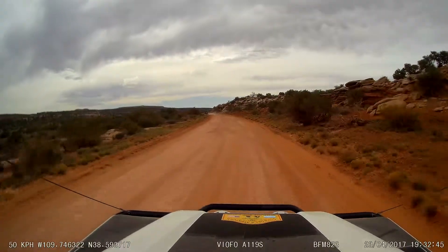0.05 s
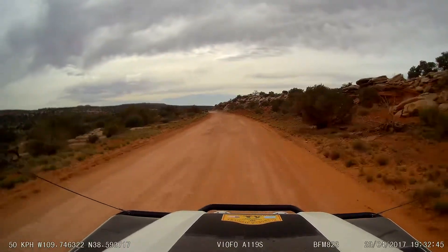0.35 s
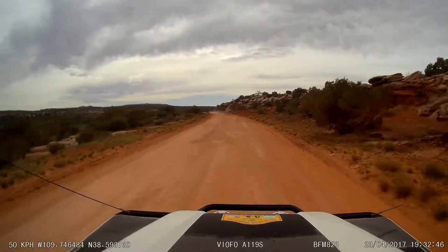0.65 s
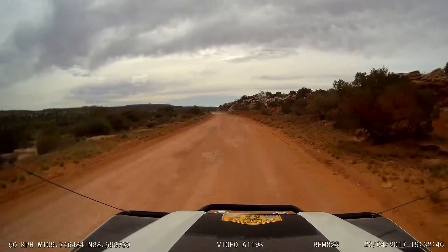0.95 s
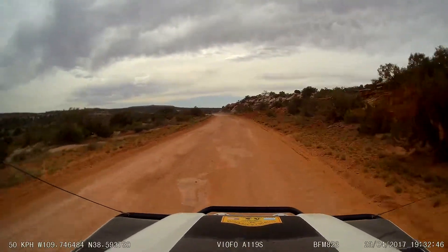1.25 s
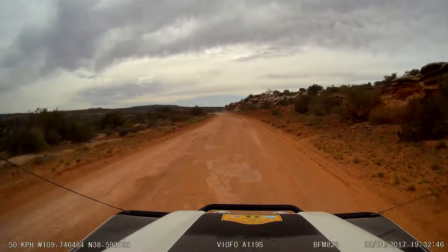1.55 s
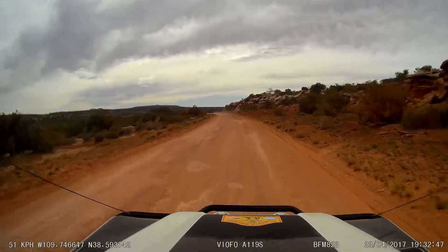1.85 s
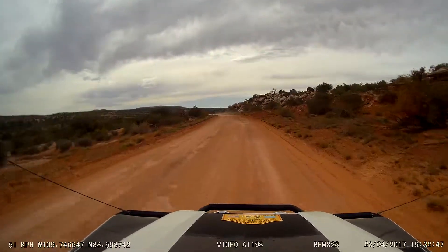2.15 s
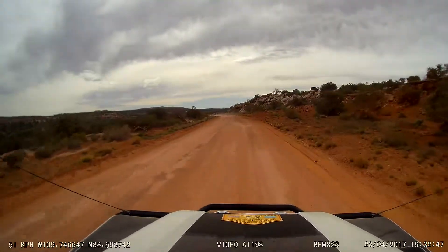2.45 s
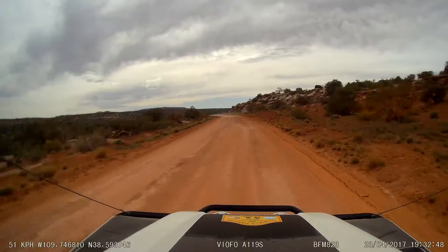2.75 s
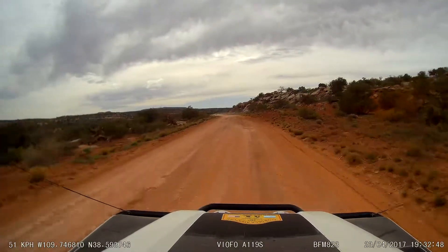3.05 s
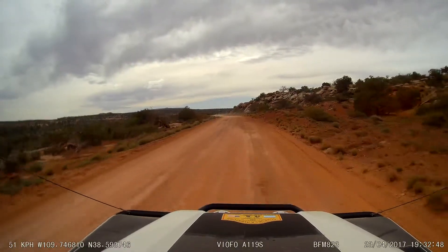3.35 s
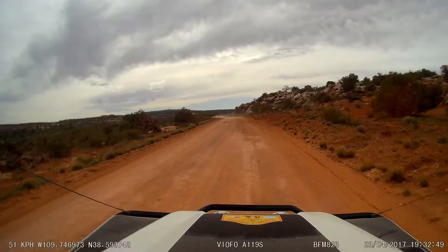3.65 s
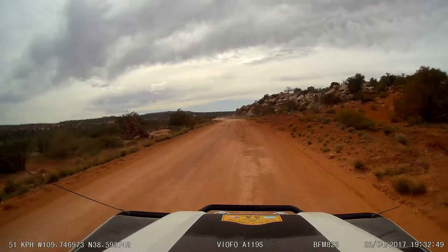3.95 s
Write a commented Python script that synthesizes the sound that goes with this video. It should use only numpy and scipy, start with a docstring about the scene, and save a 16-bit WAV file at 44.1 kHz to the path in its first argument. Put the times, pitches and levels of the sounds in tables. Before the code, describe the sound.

A vehicle drives steadily along a rough dirt road, heard inside at the windscreen. Over low rumble, tyre roar and engine drone, loose plastic knocks in quick runs. Midway, harder bumps bring thuds and brighter clacks, then the knocking continues.

```python
"""Vehicle at steady speed on a rough dirt road, heard from the windscreen.
From the start: body rumble, tyre roar, engine drone, a thin whine. Close by, the road shakes a loose
plastic part against a panel in quick runs of knocks. From 1.1 to 2.4 s the hardest bumps thud through
the suspension, set the body booming and slap the trim in brighter clacks.
Two lighter bumps follow; the knocks run on to the end."""
import sys
import numpy as np
from scipy import signal
from scipy.fft import rfft, irfft
from scipy.io import wavfile
from scipy.ndimage import uniform_filter1d

SR = 44100
rng = np.random.default_rng(int(sys.argv[2]) if len(sys.argv) > 2 else 0)


def to_wav(sig):
    """Store sig (one row per channel, or 1-D mono) as 16-bit WAV at the path in sys.argv[1].

    Samples outside -1..1 are clipped; the rate is SR.
    """
    pcm = np.clip(np.atleast_2d(sig), -1, 1) * 32767
    pcm = np.round(pcm).astype(np.int16)
    wavfile.write(sys.argv[1], SR, pcm.T)  # frames by channels


N = 176400

# knocks of the loose part: t/s, strength/dB
KNOCKS = [(0.0504, -11), (0.1847, -13), (0.2098, -6), (0.232, -12.5), (0.345, -6), (0.555, -5),
          (0.5793, -5.5), (0.6226, -10), (0.6626, -11.5), (0.7044, -7.5), (0.7418, -13), (0.7647, -11.5),
          (0.802, -11), (1.0862, -7.5), (1.1098, -8.5), (1.148, -8), (1.1842, -2), (1.21, 0.5),
          (1.2228, -6), (1.2333, 3), (1.2493, -7), (1.2617, -1), (1.2762, -6), (1.2893, 1), (1.3035, -9),
          (1.3128, -1), (1.334, -0.5), (1.3595, -2.5), (1.3812, -17), (1.4479, -3.5), (1.5102, -4),
          (1.5361, -2.5), (1.561, -3.5), (1.5832, -4), (1.6093, -5.5), (1.6303, -4), (1.6517, -6),
          (1.6722, -3.5), (1.697, -3.5), (1.7804, -8.5), (1.8044, -4.5), (1.8308, -3), (1.8506, -5.5),
          (1.8661, -3), (1.882, -10), (1.8976, 3), (1.9198, -3.5), (1.9766, -7.5), (2.002, -3.5),
          (2.0172, -11), (2.0333, 4), (2.0488, -6), (2.0716, -8), (2.0934, -6), (2.1153, -13), (2.1416, -9),
          (2.1645, -9.5), (2.206, -4), (2.2365, -5), (2.2565, -3.5), (2.28, -2), (2.3038, -6.5),
          (2.3252, -10.5), (2.35, -11.5), (2.3703, -6), (2.3993, -3.5), (2.4226, -5), (2.4435, -0.5),
          (2.47, -7), (2.4907, -4), (2.5295, -6.5), (2.5544, -5), (2.578, -10.5), (2.6399, -14),
          (2.7275, -6), (2.7647, -6), (2.7899, -5), (2.8285, -7.5), (2.8515, -6.5), (3.0293, -9),
          (3.0513, 0), (3.0753, -1.5), (3.116, -12.5), (3.1375, -16), (3.2131, -7), (3.238, -4),
          (3.2618, -10.5), (3.2856, -7.5), (3.4234, -6), (3.462, -7.5), (3.484, -8), (3.5481, -2.5),
          (3.5726, -4), (3.6139, -14), (3.6329, -14), (3.7107, -9), (3.7977, -13), (3.8204, -3.5),
          (3.8442, -8), (3.8846, -10.5)]
# knock spectrum: f/Hz, level/dB
KNOCK_SPECTRUM = [(100, -22.5), (330, -13), (650, -0.5), (950, 1), (1400, -5), (1950, -25.5), (2300, -15),
                  (2800, -8), (3150, -20.5), (3550, -31.5), (4100, -24.5), (4550, -31.5), (5100, -29),
                  (7700, -37), (9400, -31.5), (11000, -42), (16000, -52)]
# modes of the struck panel: f/Hz, level/dB, T60/s
PANEL_MODES = [(293, -38.5, 0.055), (638, -42, 0.022), (1410, -43.5, 0.014), (2670, -41, 0.021),
               (4075, -52.5, .018), (5100, -55.5, .018), (9200, -55.5, 0.01)]
# trim clacks: t/s, strength/dB, treble shelf/dB
CLACKS = [(1.1865, -9, -21), (1.2003, -8, 5.5), (1.2245, -5, 5.5), (1.2509, -8, 8), (1.2778, -2, 2.5),
          (1.3054, -11, 5), (1.3280, -17.5, 0), (1.487, -18, -8), (1.5028, -11.5, -4), (1.8515, -5, -10),
          (1.8660, -14, -11), (1.8836, -1, -5), (1.899, -16, -1), (1.9120, -13.5, -3), (2.0198, -1.5, -5),
          (2.0345, -11, 7), (2.0500, -15.5, -15), (2.0620, -16, -23), (2.2700, -15, -5), (2.3920, -23.5, 2),
          (2.4370, -11.5, -6)]
# clack spectrum: f/Hz, level/dB
CLACK_SPECTRUM = [(150, -13), (400, -13), (750, 2), (1100, -11.5), (1450, -2), (1900, -11.5), (2800, -7),
                  (3500, -19), (5000, -18), (8200, -19.5), (10000, -25.5), (12000, -27), (16000, -44)]
# road bumps: t/s, body boom/dB, suspension thud/dB
BUMPS = [(.155, -22.5, -46), (1.125, -16, -30), (1.22, -12.5, -41), (1.32, -21, -37), (1.45, -17, -34),
         (1.575, -17, -44), (1.69, -19.5, -46), (1.833, -12.5, -30), (1.885, -19, -25.5),
         (1.991, -14.5, -24.5), (2.04, -20, -35), (2.18, -15, -45), (2.359, -13.5, -30), (2.719, -19, -36),
         (2.916, -19, -51)]
# thud spectrum: f/Hz, level/dB
THUD_SPECTRUM = [(15, -36), (40, -9), (62, 4), (90, -1), (140, -3), (260, -7), (500, -32), (4000, -110)]
# body shake: t/s, level/dB
SHAKE = [(0, -24.5), (.13, -32.5), (.3, -31.5), (.48, -22.5), (.65, -26), (.78, -35.5), (.88, -27.5),
         (.98, -32.5), (1.3, -24.5), (1.55, -27), (1.7, -24.5), (1.95, -28), (2.25, -24), (2.45, -24.5),
         (2.6, -34), (2.8, -28.5), (3.03, -26.5), (3.14, -33), (3.3, -31.5), (3.5, -28.5), (3.7, -26.5),
         (4, -29.5)]
# body rumble spectrum: f/Hz, level/dB
RUMBLE_SPECTRUM = [(8, -40), (18, -6.5), (28, 3), (35, -5.5), (43, -2), (58, -7.5), (72, -14.5), (92, -28),
                   (115, -24.5), (200, -73.5), (2000, -130)]
# road roughness: t/s, level/dB
ROUGHNESS = [(0, -1), (1.05, -1), (1.25, 1), (1.42, 0.5), (1.55, 2), (1.75, -0.5), (1.9, 1.5), (2.06, 1),
             (2.3, 0.5), (2.6, 0), (3.3, -1), (4, -0.5)]
# tyre roar spectrum: f/Hz, level/dB
ROAR_SPECTRUM = [(40, -11), (90, -2.5), (120, 1.5), (180, -5.5), (280, -2), (370, -7), (440, -10),
                 (620, -10), (800, -14), (1100, -18.5), (1400, -16), (1700, -23), (2150, -35), (2750, -29),
                 (3300, -43), (4400, -42.5), (6500, -49.5), (16000, -53)]
# fizz spectrum of small rattles: f/Hz, level/dB
FIZZ_SPECTRUM = [(300, -7), (800, 13.5), (1400, 4.5), (2000, 4), (2800, -13), (3500, -8), (5000, -18),
                 (9000, -20.5), (12000, -21), (16000, -36)]
# hiss spectrum: f/Hz, level/dB
HISS_SPECTRUM = [(1000, 18), (5000, -17), (10000, -1), (14000, 5), (16000, -20)]
# engine speed: t/s, rotation rate/Hz
ENGINE_SPEED = [(0, 40.0), (.5, 40.5), (.9, 40), (1.3, 40.5), (1.9, 40.5), (2.6, 40.5), (3.2, 40.5),
                (4, 40.0)]
# engine orders, firing drone first: multiple of rotation rate, level/dB
ENGINE_ORDERS = [(2, -33), (3, -50.5), (4, -45.5), (5.07, -45.5), (6, -53), (8.4, -54.5), (7, -52.5),
                 (9, -52.5), (12, -48.5), (14, -56.5), (15.2, -52.5)]
# whine fundamental: t/s, level/dB
WHINE_LEVEL = [(0, -51.5), (.4, -50), (.9, -51), (1.2, -49), (1.7, -62), (2.1, -51.5), (2.7, -60),
               (3.2, -50), (3.6, -47.5), (4, -50.5)]
# whine octave: t/s, level/dB
OCTAVE_LEVEL = [(0, -56), (1, -56), (2, -68.5), (3, -60.5), (4, -56.5)]


def knocks():
    """Loose part strikes a panel: brighter when harder, faint chatter between, brief cabin echo."""
    gain_db, lag_s, bend_s = 10, 0.0001, 0.000445
    chatter_db, chatter_hz, chatter_spread_db = -18.5, 41.47, 3
    echo_db, echo_t60_s = -10.5, 0.0067
    ring_db, ring_t60_s, ring_above_hz = -2.5, 0.026, 5000  # the part's own treble ring
    out, t = np.zeros(N), np.arange(2048) / SR
    contact, response = signal.unit_impulse(len(t)), impulse(KNOCK_SPECTRUM, bend_s)
    chatter = [((k + .25 * shift) / chatter_hz, chatter_db + chatter_spread_db * min(size, 1.5))
               for k, (shift, size) in enumerate(rng.standard_normal((180, 2)))]
    for start_s, db in chatter + list(KNOCKS):
        echo, ring = rng.standard_normal((2, len(t)))
        echo = echo * decay(t, echo_t60_s) * (t > .002)
        ring = (ring - lowpass(ring, ring_above_hz)) * decay(t, ring_t60_s)
        blow = contact + amp(echo_db) * unit_energy(echo) + amp(ring_db) * unit_energy(ring)
        cutoff_hz = 6500 * amp(0.59 * db + 2 * rng.standard_normal())
        knock = signal.fftconvolve(lowpass(blow, cutoff_hz), response)
        add(out, start_s + lag_s, amp(gain_db + db) * knock)
        add(out, start_s + lag_s, amp(db) * panel_ring(t))
    return out


def panel_ring(t):
    """Damped panel modes; each knock lands on a new spot, so the mix varies."""
    spread_db, detune = 1.5, .015
    draws = rng.standard_normal((len(PANEL_MODES), 2))
    out = np.zeros(len(t))
    for (hz, db, t60_s), (size, shift) in zip(PANEL_MODES, draws):
        envelope = amp(db + spread_db * size) * decay(t, t60_s)
        out += envelope * np.sin(2 * np.pi * hz * (1 + detune * shift) * t)
    return out


def clacks():
    """Trim slaps on a bump: dense uneven contacts, then a short, duller cabin tail."""
    gain_db, grain_db, shelf_hz = 12, 5, 8100
    rise_s, hold_s, t60_s = 0.00055, 0.0045, 0.016  # hold at 0 dB; weaker clacks stop sooner
    tail_db, tail_t60_s, tail_cutoff_hz = -10, 0.16, 8000
    out, t = np.zeros(N), np.arange(6000) / SR
    rise = np.minimum(t / rise_s, 1)
    tail = rise * amp(tail_db) * decay(t, tail_t60_s)
    shelf = 1 - 1 / (1 + (np.fft.rfftfreq(len(t), 1 / SR) / shelf_hz) ** 4)
    for start_s, db, treble_db in CLACKS:
        contacts, sizes, echo = rng.standard_normal((3, len(t)))
        burst = rise * decay(t - hold_s * amp(db), t60_s)
        cluster = unit_rms(contacts * amp(grain_db * sizes)) * burst
        slap = unit_energy(cluster + lowpass(echo, tail_cutoff_hz) * tail)
        add(out, start_s, irfft(rfft(slap) * amp(db + treble_db * shelf)))
    return amp(gain_db) * signal.fftconvolve(out, impulse(CLACK_SPECTRUM))[:N]


def bumps():
    """Each bump thuds through the suspension and sets the body booming for a few cycles."""
    boom_hz, boom_rise_s, thud_rise_s, t60_s = 29.8, 0.0296, 0.011, 0.3
    boom_gain, thud_gain, t = np.zeros(N), np.zeros(N), np.arange(SR) / SR
    boom_shape = np.minimum(t / boom_rise_s, 1) * decay(t - boom_rise_s, t60_s)
    thud_shape = np.minimum(t / thud_rise_s, 1) * decay(t, t60_s)
    for start_s, boom_db, thud_db in BUMPS:
        add(boom_gain, start_s, amp(boom_db) * boom_shape)
        add(thud_gain, start_s, amp(thud_db) * thud_shape)
    cycles = np.cumsum(boom_hz * (1 + .1 * wander(rate_hz=12.8))) / SR
    return boom_gain * np.sin(2 * np.pi * cycles) + thud_gain * noise(THUD_SPECTRUM)


def body_rumble():
    """The body rumbles near 30 Hz, as strongly as the road shakes it."""
    rumble = noise(RUMBLE_SPECTRUM)
    running_rms = np.sqrt(uniform_filter1d(rumble ** 2, size=9000))
    return rumble / running_rms * amp(curve(SHAKE) + 0.5)


def tyres():
    """Uneven tyre roar on dirt; a fizz of small rattles, growing fast with roughness; even hiss."""
    roar_db, patch_db, hiss_db = -36, 1.5, -71
    fizz_db, flicker_db, grain_db, grains_per_s = -56.5, 4, 3, 2500
    rough_db = curve(ROUGHNESS)
    roar = unit_rms(sum(noise(ROAR_SPECTRUM) * amp(patch_db * wander(rate_hz=23)) for _ in range(2)))
    grains = amp(grain_db * np.minimum(rng.exponential(1, N), 4)) * rng.choice([-1, 1], N)
    grains *= rng.random(N) < grains_per_s / SR
    fizz = unit_rms(signal.fftconvolve(grains, impulse(FIZZ_SPECTRUM))[:N])
    fizz *= amp(fizz_db + 2 * rough_db + flicker_db * wander(rate_hz=77))
    return roar * amp(roar_db + rough_db) + fizz + amp(hiss_db) * noise(HISS_SPECTRUM)


def engine():
    """Steady firing drone plus weaker, wavering higher orders."""
    drone_waver_db, order_waver_db, jitter, drift_rad = 1.1, 3, 0.0031, 0.048
    turns = np.cumsum(curve(ENGINE_SPEED) * (1 + jitter * wander(rate_hz=8.6))) / SR
    out = np.zeros(N)
    for k, (order, db) in enumerate(ENGINE_ORDERS):
        waver = unit_rms(amp((order_waver_db if k else drone_waver_db) * wander(rate_hz=6.4)))
        drift = order * drift_rad * wander(rate_hz=5.8)
        phase = 2 * np.pi * (order * turns + rng.random()) + drift
        out += amp(db) * waver * np.sqrt(2) * np.sin(phase)
    return out


def whine():
    """Thin tone of near-constant pitch, plus its octave."""
    pitch_hz, jitter, waver_db = 1315.4, 0.002, 1.5
    phase = 2 * np.pi * np.cumsum(pitch_hz * (1 + jitter * wander(rate_hz=46))) / SR
    fundamental = amp(curve(WHINE_LEVEL) + waver_db * wander(rate_hz=28)) * np.sin(phase)
    octave = amp(curve(OCTAVE_LEVEL) + waver_db * wander(rate_hz=6.7)) * np.sin(2 * phase)
    return np.sqrt(2) * (fundamental + octave)


def amp(db):
    """dB to gain."""
    return 10 ** (np.asarray(db) / 20)


def decay(t, t60_s):
    """Unity until t = 0, then -60 dB per t60_s."""
    return amp(-60 * np.maximum(t, 0) / t60_s)


def unit_rms(x):
    """Scale to rms 1."""
    return x / np.sqrt(np.mean(x ** 2) + 1e-20)


def unit_energy(x):
    """Scale to energy 1."""
    return x / np.linalg.norm(x)


def gain_at(spectrum, hz):
    """Gain of a spectrum table, interpolated over log frequency."""
    table_hz, db = np.transpose(spectrum)
    return amp(np.interp(np.log(hz + 1), np.log(table_hz + 1), db))


def curve(points):
    """Time table at every sample."""
    return np.interp(np.arange(N) / SR, *np.transpose(points))


def add(mix, start_s, sound):
    """Mix a sound in at start_s."""
    part = mix[max(round(start_s * SR), 0):][:len(sound)]
    part += sound[:len(part)]


def wander(rate_hz):
    """Random motion below rate_hz, rms 1."""
    hz = np.fft.rfftfreq(N, 1 / SR)
    return unit_rms(irfft(rfft(rng.standard_normal(N)) * (hz > 0) / (1 + (hz / rate_hz) ** 4), N))


def noise(spectrum):
    """Steady shaped noise, rms 1."""
    hz = np.fft.rfftfreq(N, 1 / SR)
    return unit_rms(irfft(rfft(rng.standard_normal(N)) * gain_at(spectrum, hz), N))


def impulse(spectrum, bend_s=0, size=4096):
    """Causal click; bend_s is the bending-wave travel time at 1 kHz, lows arriving later."""
    hz = np.fft.fftfreq(size, 1 / SR)
    log_min_phase = np.conj(signal.hilbert(np.log(gain_at(spectrum, abs(hz)))))
    bend_rad = 4 * np.pi * bend_s * np.sign(hz) * np.sqrt(1000 * abs(hz))
    return np.fft.ifft(np.exp(log_min_phase - 1j * bend_rad)).real[:size // 2]


def lowpass(x, cutoff_hz):
    """One-pole low-pass."""
    pole = np.exp(-2 * np.pi * cutoff_hz / SR)
    return signal.lfilter([1 - pole], [1, -pole], x)


def scene():
    """Cabin mix, mono."""
    return (body_rumble() + bumps() + tyres() + engine() + whine() + knocks() + clacks())[None]


def record(dry):
    """Steep low-pass band limit."""
    cutoff_hz = 15750
    taps = signal.firwin(511, cutoff_hz, window=("kaiser", 9), fs=SR)
    return signal.oaconvolve(dry, taps[None], "same")


dry = scene()
out = record(dry)
to_wav(out)
```